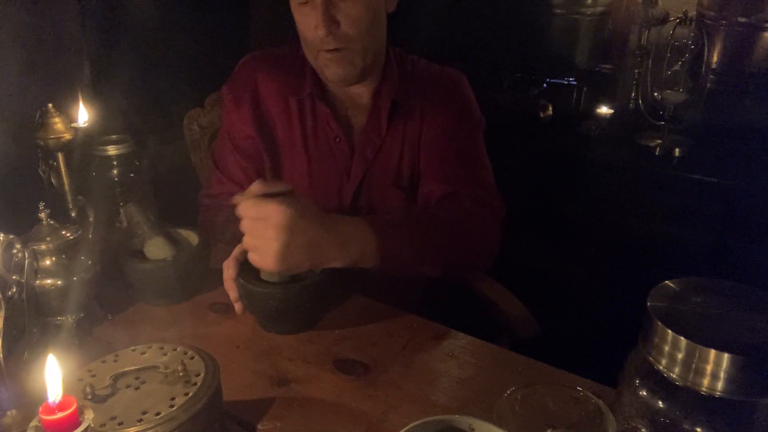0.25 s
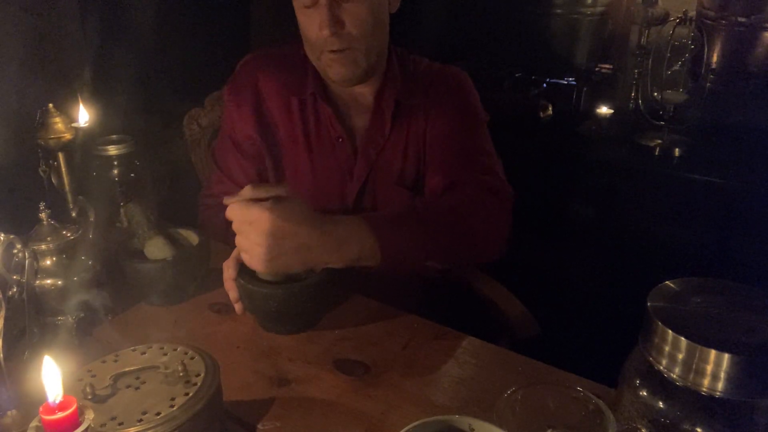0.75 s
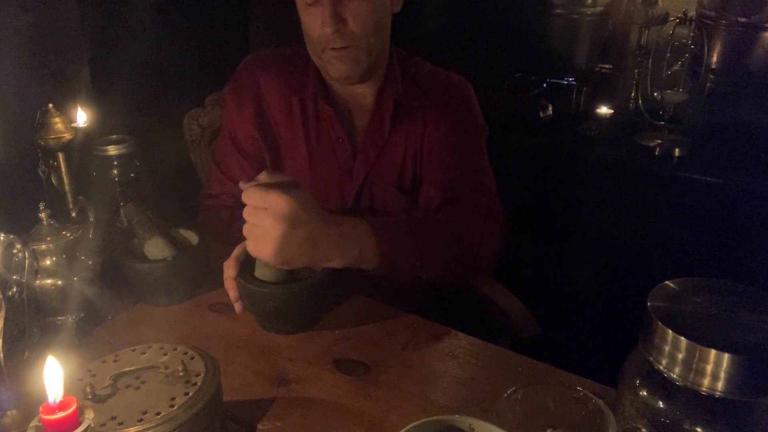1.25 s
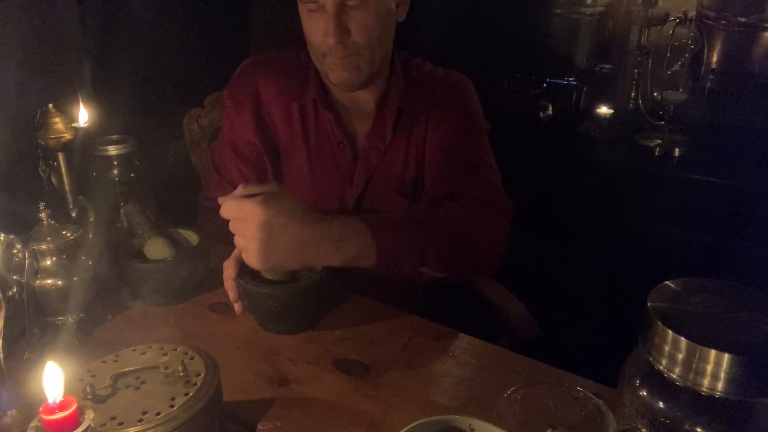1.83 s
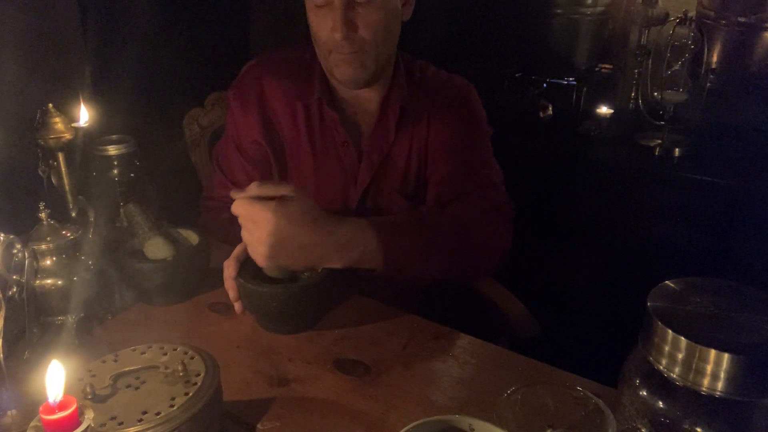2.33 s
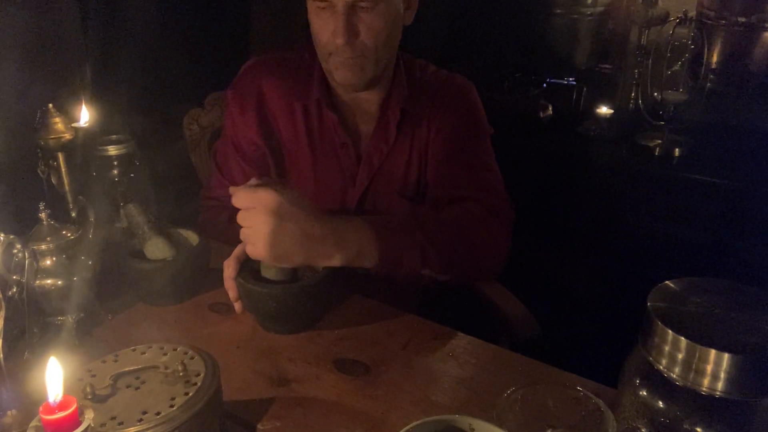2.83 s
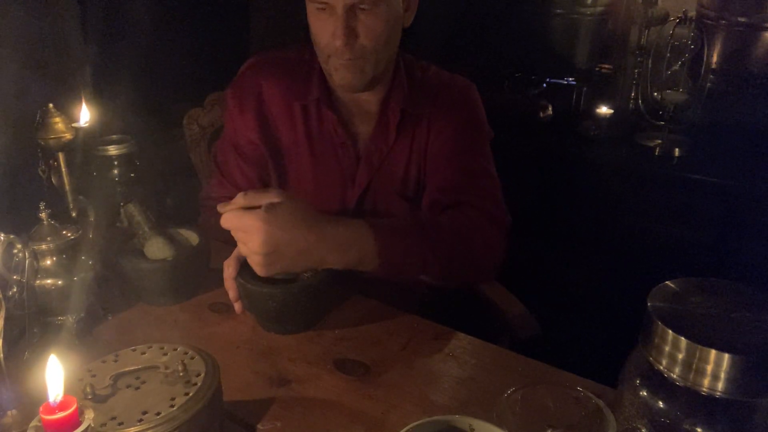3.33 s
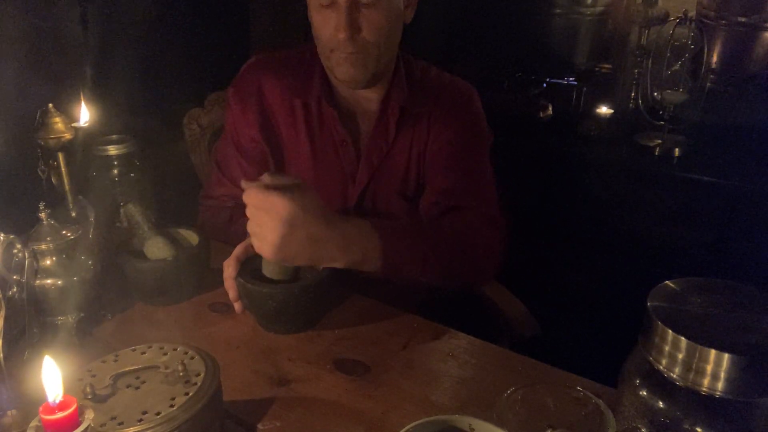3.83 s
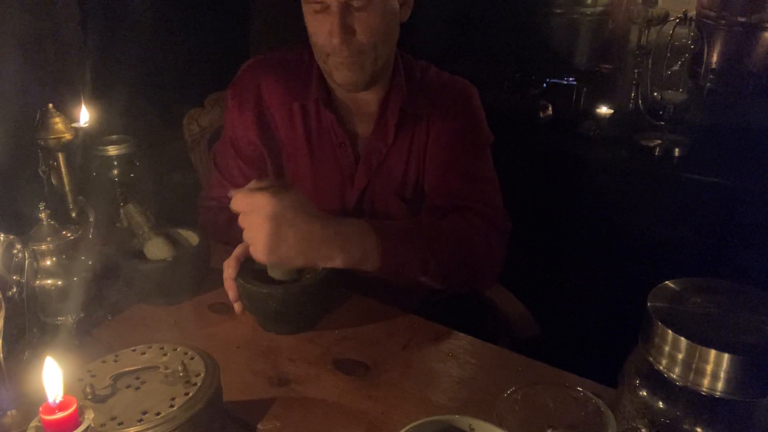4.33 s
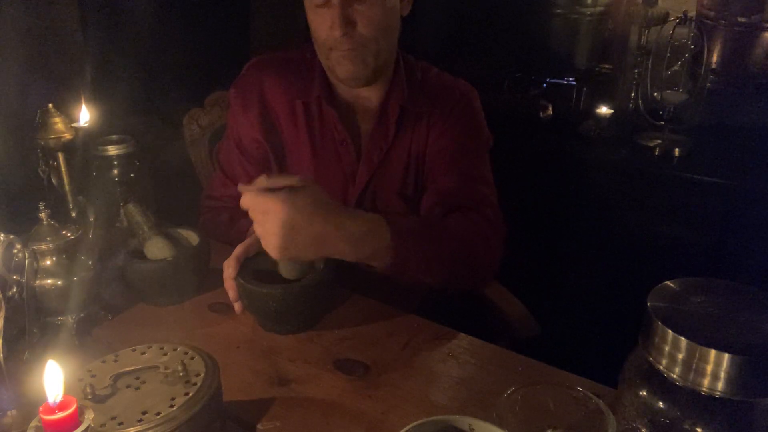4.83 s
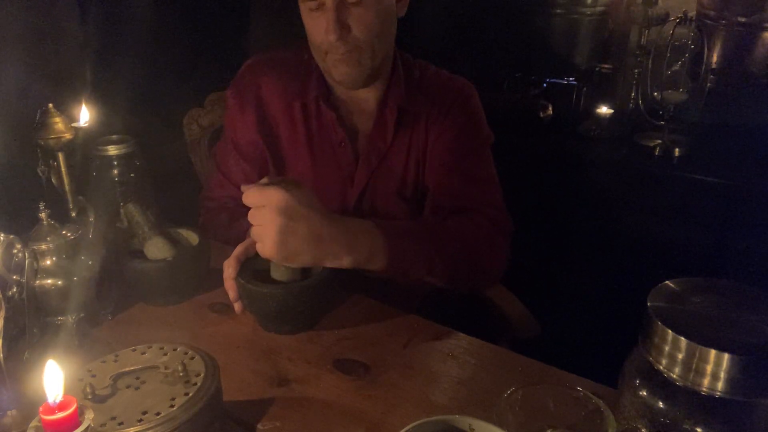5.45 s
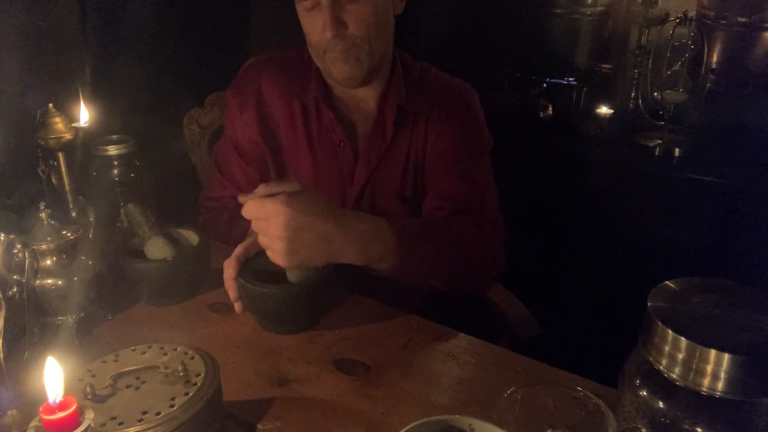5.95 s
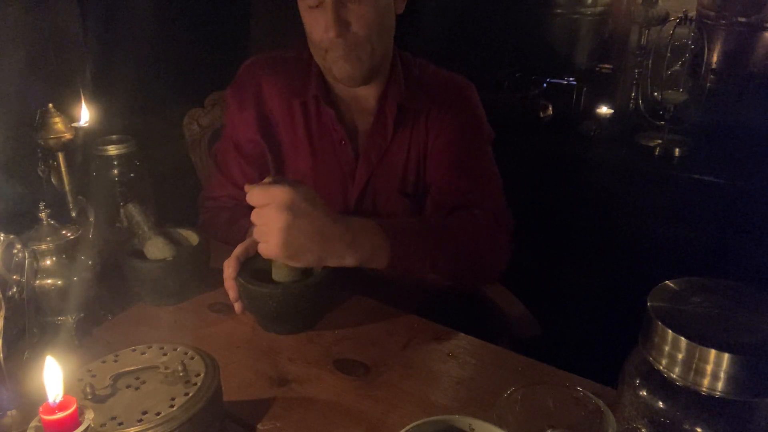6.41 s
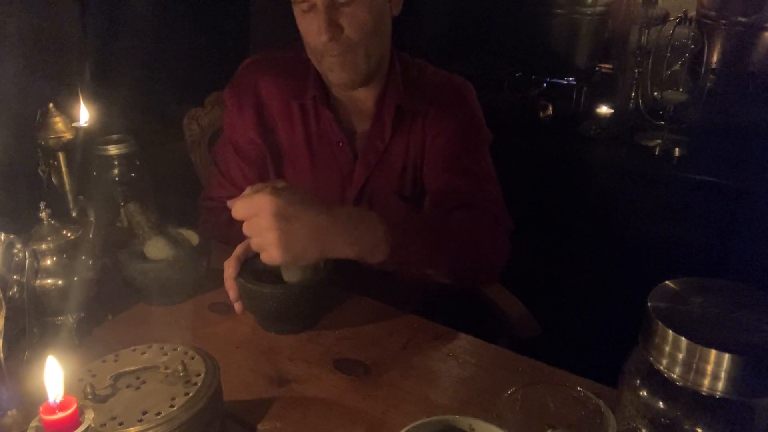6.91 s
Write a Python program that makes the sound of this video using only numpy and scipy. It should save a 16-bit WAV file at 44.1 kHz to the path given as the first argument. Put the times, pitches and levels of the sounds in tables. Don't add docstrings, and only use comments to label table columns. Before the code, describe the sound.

In a small, dry furnished room, a stone pestle works in a stone mortar on a wooden table, heard closely in stereo over quiet room tone and a thin, steady fan hiss. From 0 s, short rough scrapes and crunching grit mix with dull, padded table bumps. A light stony rattle runs along the rim around 0.45-0.7 s, and again at 1.4-1.55 s. A crisp grain crack snaps at 1.7 s. Grinding continues unevenly, with clacks at 2.4 and 3.2 s, a small clink at 4.1 s and brief lulls between. A hard, bouncing knock lands at 4.97 s with a short high ring, then more thumping scrapes. Another bright double hit comes at 5.93 s. From 6.77 to 6.9 s a rapid cluster of knocks and clinks is the loudest moment, followed by a last gritty stroke near 7 s. Low table booms trail the knocks.

```python
import sys
import numpy as np
from scipy import signal
from scipy.fft import rfft, irfft, next_fast_len
from scipy.io import wavfile
from scipy.ndimage import uniform_filter1d

SR = 44100
rng = np.random.default_rng(int(sys.argv[2]) if len(sys.argv) > 2 else 0)


def int16_out(signal):
    q = np.round(np.clip(np.atleast_2d(signal).T, -1, 1) * 32767)
    wavfile.write(sys.argv[1], SR, q.astype(np.int16))


def rack_gain(trim_db):
    fader = np.asarray(trim_db, float)
    return 10 ** (fader / 20)


N = 316638
CLOCK = np.arange(N) / SR

# start in seconds, hold in seconds, table level in dB,
# scrape level in dB, level of the arm's lean on the table in dB.
STROKES = [(0.0, 0.15, -55, -63.5, -49), (0.305, 0.034, -64, -74, -47.5), (0.54, 0.14, -55.5, -62, -57),
           (0.809, 0.1, -56, -61.5, -47), (0.983, 0.18, -54, -64.5, -52.5),
           (1.431, 0.088, -51.5, -60.5, -47), (1.666, 0.14, -57, -66.5, -47.5),
           (1.922, 0.15, -52, -62, -62), (2.127, 0.17, -70.5, -65.5, -71),
           (2.472, 0.053, -63.5, -72, -48.5), (2.622, 0.086, -52, -62.5, -60),
           (2.75, 0.06, -53, -65.5, -50), (3.384, 0.28, -53.5, -63.5, -55.5),
           (3.716, 0.047, -56.5, -74, -60), (4.177, 0.056, -65, -79, -53.5), (4.27, 0.21, -50, -61, -53),
           (4.566, 0.21, -70.5, -78, -62), (5.068, 0.15, -54, -61.5, -66), (5.307, 0.13, -49, -58, -48.5),
           (6.017, 0.04, -53.5, -64, -66), (6.206, 0.1, -51, -61, -63), (6.37, 0.089, -56.5, -68.5, -61),
           (6.55, 0.13, -65, -76, -59), (6.972, 0.16, -52, -62, -47)]
# time in seconds, peak in dB, clatter near 1.2 kHz in dB,
# clatter near 2.5 kHz in dB (both relative to the blow), hardness in dB per octave.
BLOWS = [(0.434, -51, 2, -7, 0), (0.457, -31, -25, -37, -0.5), (1.441, -36.5, -12.5, -33, 2),
         (1.508, -38, -2, -33, -2.5), (1.622, -47.5, -17, -11, 1), (2.381, -41, 8, -3, 4),
         (2.401, -32, -16, -18, 0.5), (3.191, -31.5, -7.5, -11.5, -5.5), (3.201, -42, -18, -20, 7),
         (3.386, -41.5, -9, -8, -5.5), (4.096, -44, -10.5, -8, -8.5), (4.9734, -19.5, -8.5, -2.5, 1),
         (4.987, -25, -8, -9, 2.5), (5.283, -33.5, -8.5, -2, 0), (5.9307, -26.5, -17, -0.5, 7),
         (5.943, -22.5, -10, -18, 0.5), (6.53, -40.5, -5, -22, 7), (6.768, -35, -2, -3, -0.5),
         (6.783, -28.5, -9, -14, 0.5), (6.827, -30.5, -23, -20, 6), (6.855, -20, -16, -16, 3),
         (6.876, -16, -10, -15, 1), (6.8954, -20, -11.5, -12, 5.5)]
# time in seconds, peak in dB, favoured table mode in Hz,
# clatter in dB relative to the bump.
BUMPS = [(0.069, -43, 250, -20), (0.142, -36.5, 298, -20), (0.292, -44.5, 186, -16), (0.543, -44, 270, -16),
         (0.617, -40.5, 406, -15), (0.824, -44, 286, -18), (0.887, -45, 256, -18), (0.922, -36, 270, -19),
         (1.029, -40.5, 191, -8), (1.079, -31.5, 298, -17.5), (1.106, -47, 307, -24),
         (1.15, -43.5, 273, -26), (1.71, -33, 275, -10.5), (1.794, -43, 264, -18), (2.012, -37, 306, -18),
         (2.665, -35, 264, -14), (2.809, -41, 300, -16), (3.496, -45, 258, -24), (3.613, -38.5, 253, -18),
         (4.292, -38, 280, -10), (4.343, -36.5, 269, -13), (4.41, -36, 308, -12.5), (4.42, -40.5, 380, -21),
         (4.477, -41.5, 215, -18), (5.409, -36, 277, -14), (5.449, -34.5, 280, -15),
         (5.637, -43.5, 326, -21), (6.222, -36.5, 390, -19), (6.263, -39, 266, -25),
         (6.324, -36.5, 278, -15), (6.414, -43.5, 256, -25), (6.638, -39.5, 334, -12.5)]
# time in seconds, peak in dB, centre in Hz,
# loss at each bounce in dB.
SNAPS = [(0.436, -41.5, 1330, 3.5), (1.4415, -38.5, 1300, 10), (1.4988, -40.5, 1270, -1.5),
         (2.381, -27, 1380, 0), (3.1904, -26.5, 1200, 21), (3.3879, -44, 1070, 12),
         (4.9733, -17.5, 1600, 12), (5.283, -36.5, 1200, 10), (5.9316, -18, 2000, 26),
         (6.53, -46, 1230, 12), (6.7718, -24, 1720, 7), (6.7838, -26, 1700, 4), (6.829, -36, 1300, 3),
         (6.8561, -24.5, 1320, -0.5), (6.875, -17.5, 1650, 17)]
# frequency in Hz, level in dB per Hz.
CLATTER_LOW = [(450, -11), (650, -0.5), (830, 6.5), (1050, 2.5), (1320, 4), (1700, -5), (2100, -23.5)]

STROKE_RISE_DB_S, STROKE_FALL_DB_S = 257, 171
LEFT_BASS_DB = 0.9
SNAP_WIDTH = 0.79


def level(x, db):
    return x * rack_gain(db) / np.sqrt(np.mean(x ** 2))


def colour(x, points):
    hz, db = np.transpose(points)
    size = next_fast_len(N)
    bins = np.maximum(np.arange(size // 2 + 1) * SR / size, 1)
    gain = rack_gain(np.interp(np.log(bins), np.log(hz), db))
    return irfft(rfft(x, size) * gain, size)[..., :N]


def walk(rate):
    k = int(SR / rate)
    steps = np.repeat(rng.standard_normal(N // k + 1), k)
    return 1.29 * uniform_filter1d(uniform_filter1d(steps, k), k)[:N]


def swells(start, hold, db, rise_db_s, fall_db_s, rest_db):
    t = CLOCK[::64, None]
    early = np.maximum(start - t, 0)
    late = np.maximum(t - start - hold, 0)
    each = db - rise_db_s * early - fall_db_s * late
    power = np.sum(rack_gain(2 * each), axis=1) + rack_gain(2 * rest_db)
    return np.interp(CLOCK, t[:, 0], 10 * np.log10(power))


def ring(modes, scatter_db, apart_hz, seconds, detune=0.017, rise_cycles=0.24, left_db=0):
    hz, db, t60 = (column[:, None] for column in np.transpose(modes))
    size, off, turn, sign = rng.standard_normal((4, len(modes), 1))
    t = np.arange(int(seconds * SR)) / SR
    rise = 1 - np.exp(-t * hz / rise_cycles)
    fade = np.sign(sign) * rack_gain(db + scatter_db * size - 60 * t / t60) * rise
    phase = 2 * np.pi * hz * (1 + detune * off) * t
    lag = turn * np.minimum(hz / apart_hz, 1.5)
    lean_db = left_db * np.tanh(3 * np.log2(470 / hz))
    out = np.array([np.sum(fade * rack_gain(side * lean_db) * np.sin(phase + side * lag), axis=0)
                    for side in (1, -1)])
    return out / np.abs(out).max()


def shake(force, response):
    return level(signal.fftconvolve(force[None], response, axes=1)[:, :N], 0)


def dense(points, side_db):
    mid, side = colour(rng.standard_normal((2, N)), points)
    side = rack_gain(side_db) * side
    return level(np.array([mid + side, rack_gain(4.5) * (mid - side)]), 0)


def click(hz, width_hz):
    t = (np.arange(256) - 128) / SR
    return np.cos(2 * np.pi * hz * t) * np.exp(-(np.pi * width_hz * t) ** 2 / 2)


def slips(per_s, spread_db):
    when, size, sign = rng.random(N), rng.exponential(size=N), rng.standard_normal(N)
    return (when < per_s / SR) * rack_gain(spread_db * size) * np.sign(sign)


def grinding():
    # frequency in Hz, level in dB, 60 dB fade in seconds.
    table_modes = [(157.8, -9, 0.21), (125.6, -20, 0.96), (185, -4, 0.067), (232, 2, 0.056),
                   (258.4, -2, 0.15), (280, 2, 0.059), (314, -1.5, 0.14), (375.5, 0, 0.06),
                   (404, -11, 0.044), (442, -11.5, 0.16), (522, -31.5, 0.32), (566, -5.5, 0.036),
                   (648, -5, 0.048), (734, -12.5, 0.043)]
    upper_modes = [(820, 9, 0.058), (903, 7.5, 0.079), (1000, -13, 0.062), (1200, 9, 0.015), (1323, 5, 0.2),
                   (1544, 6.5, 0.037), (1730, -12, 0.15), (1740, -12, 0.04), (2093, 4.5, 0.098),
                   (2300, -18, 0.05), (2640, 13, 0.024), (3040, -18, 0.015), (3500, -44, 0.072)]
    # frequency in Hz, level in dB per Hz.
    grit_colour = [(900, -14), (2000, -1), (3200, 6.5), (4500, 5), (6000, -2.5), (8000, 5.5),
                   (12000, -13.5), (15500, -20), (15850, -70)]
    # start in seconds, hold in seconds, level in dB.
    crushes = [(0.0, 0.052, -55.5), (0.298, 0.021, -67), (0.603, 0.13, -68), (0.793, 0.058, -51.5),
               (0.91, 0.13, -64.5), (1.2, 0.031, -61.5), (1.453, 0.18, -64), (1.663, 0.022, -52),
               (1.803, 0.44, -67.5), (2.473, 0.086, -62.5), (2.643, 0.019, -50.5), (2.793, 0.022, -68),
               (3.35, 0.072, -58.5), (3.486, 0.011, -55.5), (3.59, 0.022, -55.5), (4.115, 0.024, -63),
               (4.298, 0.03, -50.5), (4.384, 0.042, -59.5), (4.673, 0.08, -68), (5.055, 0.17, -58.5),
               (5.285, 0.024, -53), (5.356, 0.071, -60.5), (6.002, 0.062, -56.5), (6.199, 0.029, -51),
               (6.634, 0.075, -74), (6.902, 0.013, -53), (7.019, 0.024, -52.5), (7.07, 0.031, -63.5)]
    start, hold, table_db, scrape_db, _ = np.transpose(STROKES)
    db = swells(start, hold, table_db, STROKE_RISE_DB_S, STROKE_FALL_DB_S, rest_db=-74.5)
    upper_db = swells(start, hold, scrape_db, rise_db_s=400, fall_db_s=231, rest_db=-79.5)
    grit_db = swells(*np.transpose(crushes), rise_db_s=230, fall_db_s=177, rest_db=-86)

    judder = walk(30)
    force = slips(500, spread_db=1.4) * rack_gain(db + 3.0 * judder)
    table = 0
    for _ in range(5):
        spot_force = force * rack_gain(4.15 * walk(14))
        table = table + shake(spot_force, ring(table_modes, 1.5, 2100, 0.34, detune=0.027, left_db=LEFT_BASS_DB))
    table = level(table, 1.0) * np.sqrt(np.mean(rack_gain(db) ** 2))

    scrape = shake(slips(900, spread_db=2.5), ring(upper_modes, 3.0, 3000, 0.1))
    scrape = scrape + rack_gain(1.0) * dense(CLATTER_LOW, -23.0)
    scrape = scrape * rack_gain(upper_db - 5.0 + 3.95 * judder)

    crunch = slips(5000, spread_db=3.0) + 0.38 * rng.standard_normal(N)
    both_ports = np.array([crunch, np.roll(crunch, shift=1)])
    grit = level(colour(both_ports, grit_colour), 0) * rack_gain(grit_db - 7.5 + 2.0 * walk(40))
    return table + scrape + grit


def knocks():
    # frequency in Hz, level in dB, 60 dB fade in seconds.
    knocked = [(122.6, -12, 0.23), (192.8, -6.5, 0.15), (241.4, -9, 0.11), (264, 1, 0.078),
               (278, -1.5, 0.075), (313.2, -3.5, 0.078), (379.6, -2, 0.06), (405, -2, 0.066),
               (506, -11, 0.09), (571.5, -8.5, 0.1), (628.7, -12, 0.12), (654, -10, 0.057),
               (830, -20, 0.13), (901, -17, 0.055)]
    # frequency in Hz, level in dB per Hz.
    clatter_high = [(1300, -46), (1700, 7), (2050, 4), (2500, -3.5), (3300, -7), (4200, -1), (5500, -57)]
    size = SR // 5
    t = CLOCK[:size]
    body = np.zeros((2, N + SR))
    low, high = dense(CLATTER_LOW, -7.0), dense(clatter_high, -0.71)

    hard = [row + (1.6, 300, 0) for row in BLOWS]
    soft = [(s, db, clatter_db, clatter_db + 1, 0.5, 5.8, hz, 14.5) for s, db, hz, clatter_db in BUMPS]
    for s, db, low_db, high_db, tilt_db, push_ms, spot_hz, focus_db in hard + soft:
        i = int((s + 0.0011) * SR)
        at = slice(i // 2, i // 2 + size)
        push = np.minimum(1000 * t / push_ms, 1)
        modes = []
        for hz, gain_db, t60 in knocked:
            gain_db = gain_db + tilt_db * np.log2(hz / 300) - focus_db * abs(np.log2(hz / spot_hz))
            modes.append((hz, gain_db, t60))
        hit = ring(modes, 1.94, 3100, size / SR, detune=0.011, left_db=LEFT_BASS_DB)
        hit = hit + low[:, at] * rack_gain(low_db - 2.5 - 60 * t / 0.074)
        hit = hit + high[:, at] * rack_gain(high_db - 13.0 - 60 * t / 0.14)
        body[:, i:i + size] += hit * push * rack_gain(db)
    return signal.sosfilt(signal.butter(6, 4800, fs=SR, output="sos"), body)[:, :N]


def snaps():
    # time in seconds, peak in
    # dB, centre in Hz, width in Hz.
    splits = [(1.6195, -35, 4200, 3200), (1.7088, -22.5, 4600, 3200), (1.7083, -27, 10300, 6200),
              (2.484, -49, 3100, 1200), (4.0965, -44, 4000, 3200), (3.8, -54, 4800, 2500),
              (3.5, -44, 2000, 1500), (.4575, -45, 1200, 900), (5.9317, -35, 5200, 1600),
              (.713, -55, 3600, 700), (4.9743, -31, 3100, 1800), (6.773, -34, 3180, 1500),
              (6.784, -36, 2500, 1200), (6.857, -36, 2600, 1000), (8, -28, 2400, 1300),
              (2.3808, -48, 3400, 830), (2.3886, -48, 3250, 600), (5.9316, -30, 3200, 2300),
              (5.9425, -36, 2500, 1500), (6.8955, -23.5, 1800, 1800)]
    contacts = [(s, db, hz, SNAP_WIDTH * hz) for s, db, hz, _ in SNAPS]
    out = np.zeros(N + SR)
    for s, db, hz, width_hz in contacts + splits:
        i = int((s + 0.0006) * SR) - 128
        out[i:i + 256] += rack_gain(db - 0.6) * click(hz, width_hz)
    return out[:N] * rack_gain(np.array([[-0.8], [0.8]]))


def bounces():
    first_hop_s, shrink, touches = 0.0071, 0.69, 5
    out, t = np.zeros(N + SR), CLOCK[:SR // 40]
    for s, db, hz, loss_db in SNAPS:
        for k, (slip, off) in enumerate(rng.standard_normal((touches, 2))):
            wait = first_hop_s * (1 - shrink ** k) / (1 - shrink)
            i = int((s + 0.0004 + wait + 0.00019 * slip * (k > 0)) * SR)
            touch_db = db - loss_db * k
            if k > 0:
                out[i - 128:i + 128] += rack_gain(touch_db - 2) * click(hz, SNAP_WIDTH * hz)
            tone = np.sin(2 * np.pi * hz * (1 + 0.046 * off) * t)
            tone = tone + rack_gain(-11) * np.sin(2 * np.pi * 1.66 * hz * t)
            fade = (1 - np.exp(-t / 0.0018)) * rack_gain(touch_db - 7.5 - 60 * t / 0.011)
            out[i:i + len(t)] += tone * fade
    return out[:N] * rack_gain(np.array([[-1.2], [1.2]]))


def clinks():
    # frequency in Hz, level in dB, share of the ring time.
    bowl_modes = [(4194, 0, 1), (4245, -8, .8), (4143, -3, 1), (4310, -10, .4), (4040, -12, .3),
                  (4420, -15, .25), (8850, -30, .6)]
    thin_modes = [(8700, 2, 1), (9050, 3, 1), (8800, -11, .6)]
    # time in seconds, peak in dB, 60 dB fade in seconds.
    bare_hits = [(2.387, -57, 0.17), (2.5162, -68, .07), (3.189, -66, .06), (4.0974, -50, 0.07),
                 (4.14, -70, .05), (4.976, -56, 0.063), (4.982, -49, 0.046), (4.992, -51, 0.054),
                 (5.015, -57.5, .05), (5.024, -68, .09), (5.921, -52, .05), (5.9308, -34, 0.063),
                 (5.947, -60, 0.066), (5.981, -58, .07), (6.771, -44, .05), (6.783, -46, 0.075),
                 (6.811, -62, .08), (6.83, -54, 0.25), (6.855, -53, 0.053), (6.8734, -39, 0.052),
                 (6.884, -48, 0.066), (6.8952, -42, 0.074), (6.914, -59, 0.1), (6.94, -67, 0.11)]
    # time in seconds, peak
    # in dB.
    rattles = [(.4578, -67), (0.4758, -59), (.5, -66), (.518, -56), (0.525, -58), (.535, -56),
               (0.5445, -55), (0.5527, -51.5), (.566, -65), (.6005, -57), (.61, -61), (0.619, -55),
               (.632, -59), (0.638, -54), (.6527, -51), (.667, -59), (.678, -69), (.6894, -49.5),
               (1.4193, -59), (1.4402, -46.5), (1.452, -52), (1.462, -60), (1.472, -57), (1.482, -55),
                     (1.49, -52), (1.498, -54), (1.509, -60), (1.52, -60), (1.536, -60), (1.548, -63)]
    # time in seconds, peak in dB, 60 dB fade in seconds.
    glances = [
        (6.832, -64, .08),
        (6.846, -57, 0.091),
        (6.856, -52, .06),
        (6.879, -51, .06),
        (6.886, -57, .06),
    ]
    size = SR // 7
    out = np.zeros((2, N + SR))
    rim_hits = [(s, db - 5, 0.045) for s, db in rattles]
    for s, db, t60 in bare_hits + rim_hits:
        i = int((s + 0.00035) * SR)
        modes = [(hz, gain_db, share * t60) for hz, gain_db, share in bowl_modes]
        tone = ring(modes, 1.8, 28000, size / SR, detune=0.0027, rise_cycles=4.1)
        out[:, i:i + size] += rack_gain(db + 4.0) * tone
    for s, db, t60 in glances:
        i = int(s * SR)
        modes = [(hz, gain_db, share * t60) for hz, gain_db, share in thin_modes]
        tone = ring(modes, 2.5, 28000, size / SR, detune=0.0025, rise_cycles=8)
        out[:, i:i + size] += rack_gain(db) * tone
    return out[:, :N] * rack_gain(2.5 * walk(200) + np.array([[-1.3], [1.3]]))


def sway():
    # frequency in Hz, level in dB, 60 dB fade in seconds.
    leg_modes = [(40.8, -5, 0.35), (53.4, -5.5, 0.19), (61.6, -11, 0.84), (81, -23, 0.14),
                 (109.6, 8, 0.046)]
    kicked_modes = [(60, -8, 0.27), (107.4, 0.5, 0.11), (120, 0, 0.081)]
    start, hold, _, _, lean_db = np.transpose(STROKES)
    knock_s, knock_db = np.transpose([row[:2] for row in BLOWS + BUMPS])
    lean = swells(start, hold, lean_db, STROKE_RISE_DB_S, STROKE_FALL_DB_S, rest_db=-78)
    kick = swells(knock_s + 0.024, 0, knock_db - 16.5, rise_db_s=900, fall_db_s=169, rest_db=-78)
    rock = shake(rng.standard_normal(N), ring(leg_modes, 0.48, 550, 0.5))
    boom = shake(rng.standard_normal(N), ring(kicked_modes, 0.48, 550, 0.5))
    return rock * rack_gain(lean - 6.5) + boom * rack_gain(kick - 5.0)


def room(x):
    t60_s, room_db = 0.18, -10.5
    t = CLOCK[:SR // 2]
    mid, side = rng.standard_normal((2, len(t))) * rack_gain(-60 * t / t60_s) * (t > 0.004)
    side = signal.sosfilt(signal.butter(2, 550, "high", fs=SR, output="sos"), side)
    tail = np.array([mid + side, mid - side])
    tail = signal.sosfilt(signal.butter(1, 3500, fs=SR, output="sos"), tail)
    tail = tail / np.sqrt(np.sum(tail[0] ** 2))
    return signal.fftconvolve(x.mean(axis=0)[None], tail, axes=1)[:, :N] * rack_gain(room_db)


def fan():
    # frequency in Hz, level in dB per Hz.
    hiss_colour = [(4500, -59), (5700, -6), (6700, -34), (7300, -13.5), (8400, -12.5), (9200, -1.5),
                   (9800, 6), (10300, 1), (10900, -5), (11600, -7), (12400, -5), (13600, -6.5),
                   (15600, -11), (15850, -69)]
    # frequency in Hz, rms level in dB.
    whines = [(9931, -72), (10121, -74), (9650, -80), (1680, -82)]
    in_phase_hz, turn_hz = 8780, 5100
    hiss = level(colour(rng.standard_normal(N), hiss_colour), -57.5) * rack_gain(0.7 * walk(14))
    for hz, db in whines:
        loudness = np.sqrt(2) * rack_gain(db + 1.1 * walk(3.24))
        hiss = hiss + loudness * np.sin(2 * np.pi * np.cumsum(hz + 6 * walk(5.9)) / SR)
    bins_hz = np.arange(N // 2 + 1) * SR / N
    turn = np.exp(-2j * np.pi * (bins_hz - in_phase_hz) / turn_hz)
    return np.array([hiss, irfft(rfft(hiss) * turn, N)])


def air():
    # frequency in Hz, level in dB per Hz.
    air_colour = [(25, -6), (54, 4), (158, -19), (290, -5.5), (420, -13), (687, -4.5), (974, -34),
                  (1350, -17), (1670, 0), (2300, -20), (3150, -23), (4000, -20.5), (5700, -16.5),
                  (6800, -26), (9000, -58)]
    flicker = rack_gain(np.array([1.75 * walk(14), 0.38 * walk(16)]))
    mid, side = colour(rng.standard_normal((2, N)), air_colour) * flicker
    side = colour(side, [(100, -19), (400, -4.0), (900, 0.0), (8000, 2.5)])
    return level(np.array([mid + side, rack_gain(5.0) * (mid - side)]), -63)


def scene():
    work = grinding() + knocks() + snaps() + bounces() + clinks()
    return work + room(work) + sway() + fan() + air()


def band_limit(x):
    return signal.sosfilt(signal.butter(12, 15800, fs=SR, output="sos"), x)


def record(dry):
    return band_limit(dry)


dry = scene()
out = record(dry)
int16_out(out)
```